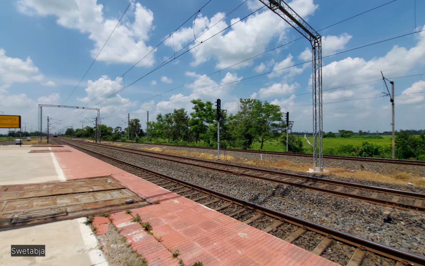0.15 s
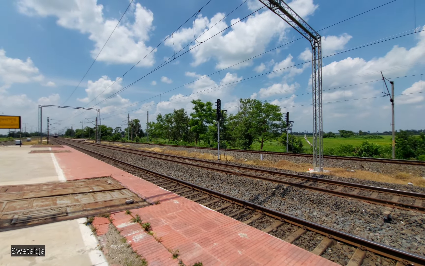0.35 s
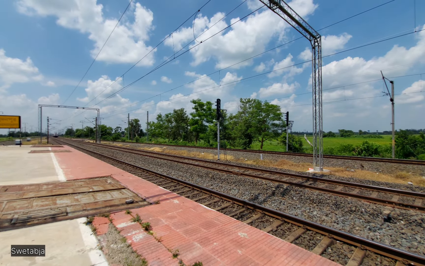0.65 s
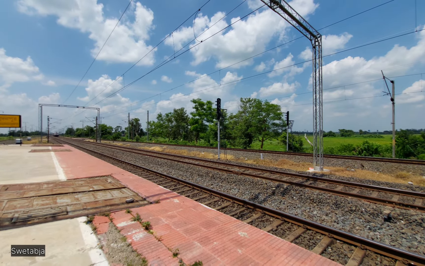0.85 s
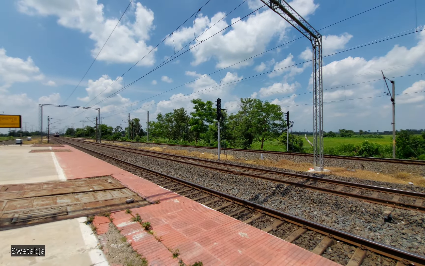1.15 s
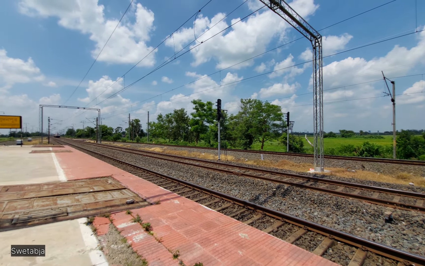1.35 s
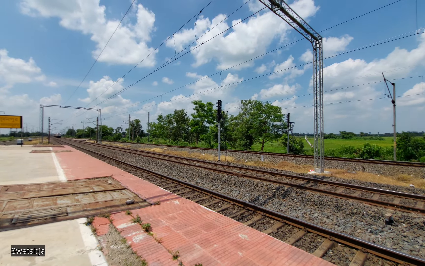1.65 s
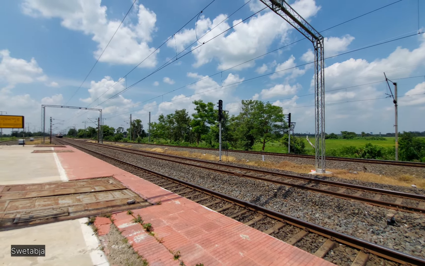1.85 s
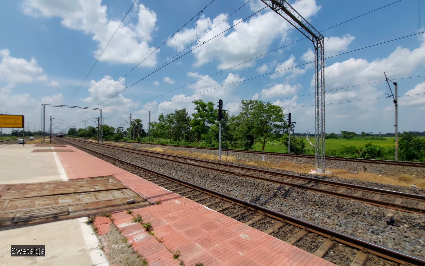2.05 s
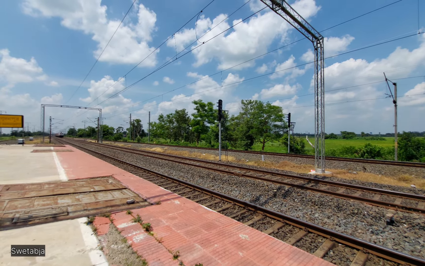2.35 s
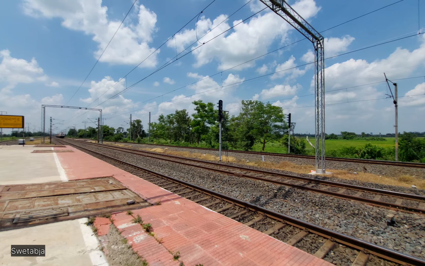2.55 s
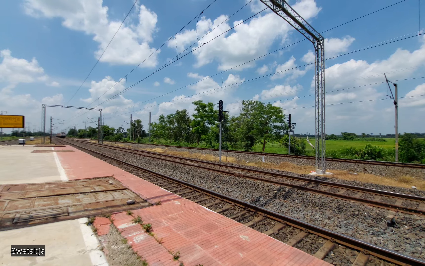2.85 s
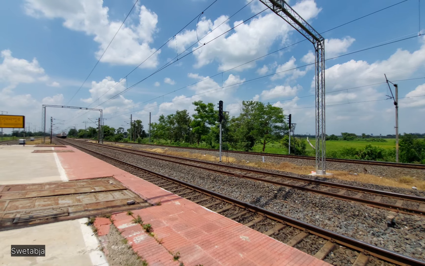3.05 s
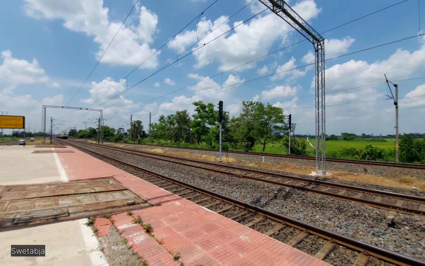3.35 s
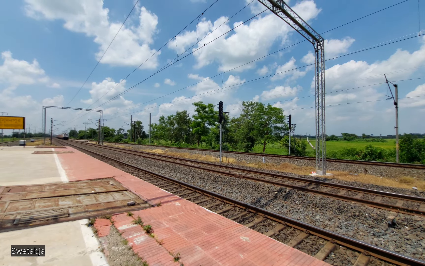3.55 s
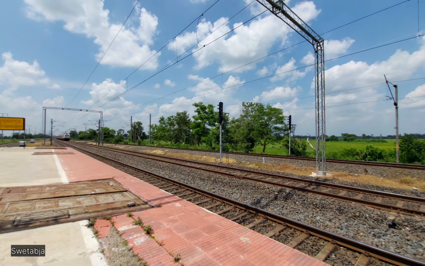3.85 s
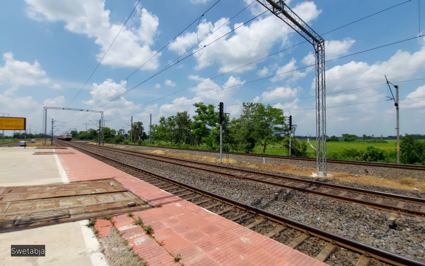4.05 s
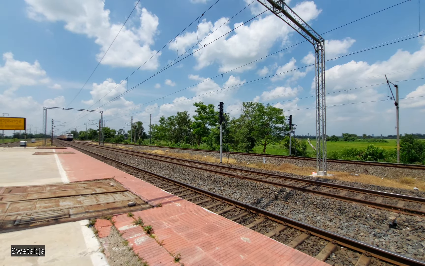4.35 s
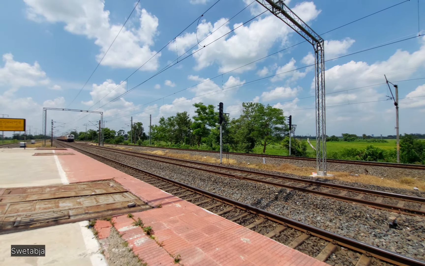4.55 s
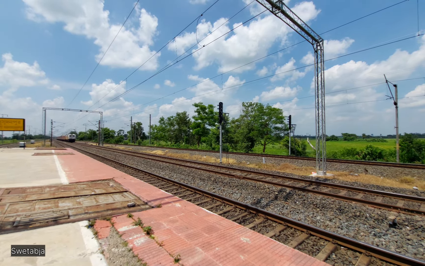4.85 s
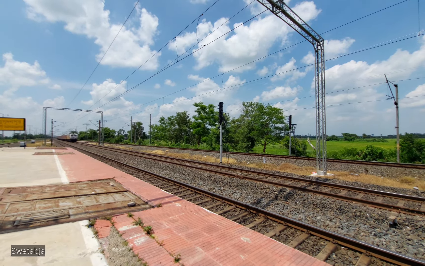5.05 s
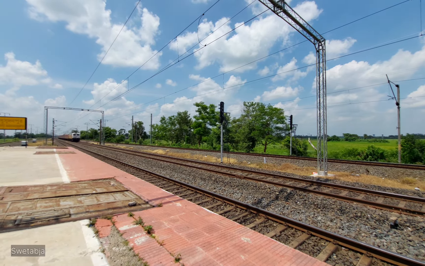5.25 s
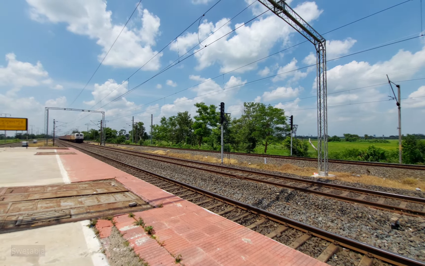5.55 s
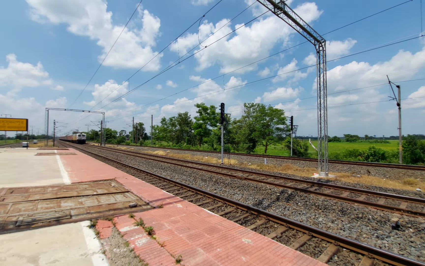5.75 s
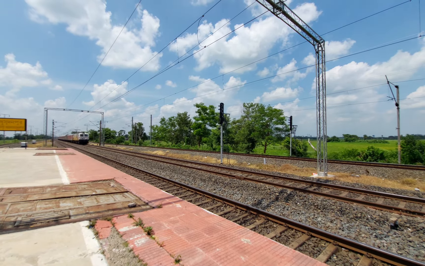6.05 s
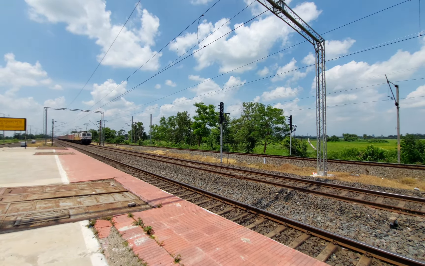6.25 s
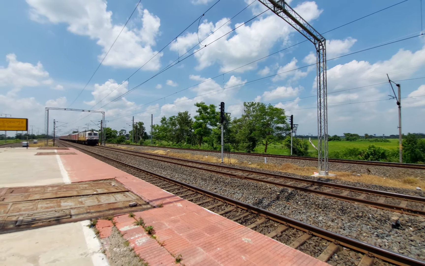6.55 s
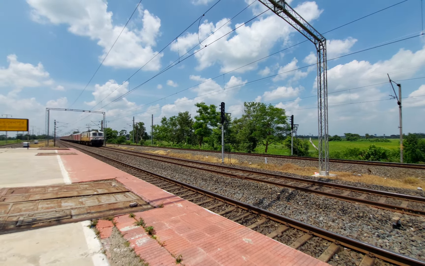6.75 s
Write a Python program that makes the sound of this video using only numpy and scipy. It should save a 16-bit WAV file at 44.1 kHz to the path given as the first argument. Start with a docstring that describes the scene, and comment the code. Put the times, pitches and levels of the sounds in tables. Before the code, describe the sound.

An open-air country railway platform, heard through a stereo microphone buffeted by wind. At 0 s the faint echo of an air horn is dying away over low wind rumble, soft train rolling and thin rail hiss. From 0.3 to 1.8 s a distant electric locomotive blows one long note, mid-pitched around 350 Hz, its overtones swelling and fluttering in the moving air. It fades in echoes while a heavy wind thump lands near 1.9 s. Between 2.3 and 2.85 s a few tiny far birds chirp. From about 3.1 s a low unsteady hum grows strong and the rolling and hiss rise, with short treble sizzles. At 4.15 s the second blast starts slightly sharp, settles on the same note, and is much louder and brighter, becoming steadier after 6 s and lasting to the end near 6.9 s. Wind slaps hit mainly the left side; very short crackles break the horn around 6.6-6.8 s.

```python
"""The echo of a one-note air horn dies away, then an electric locomotive nearing a country platform blows
two long blasts: sums of overtones that moving air makes swim. Through it all the train rolls and hisses
(shaped noise with fuzzy tones) and wind rumbles, thumps and slaps (low noise in swells). Between the blasts
a few far birds chirp (sliding sine tones), then a low hum (an unsteady sine) grows strong. The second
blast lasts to the end; a few very short crackles of noise cut into it near its close."""
import sys
import numpy as np
from scipy.fft import rfft, irfft, next_fast_len
from scipy.io import wavfile
from scipy.ndimage import uniform_filter1d, map_coordinates

SR = 44100
rng = np.random.default_rng(int(sys.argv[2]) if len(sys.argv) > 2 else 0)


def generate_wav(sig):
    """Save sig (samples, or channels by samples) to the path in sys.argv[1] as 16-bit PCM at SR."""
    pcm = np.round(np.clip(np.atleast_2d(sig).T, -1, 1) * 32767).astype(np.int16)
    wavfile.write(sys.argv[1], SR, pcm)


N = 304290
T = np.arange(N) / SR  # time of each sample in seconds
STEP = 32  # samples between the points of slow controls


def amp(db):
    """Turn dB into a gain."""
    return 10 ** (np.asarray(db) / 20)


def unit(x):
    """Scale a signal to an rms (average strength) of 1."""
    return x / np.sqrt(np.mean(np.abs(x) ** 2) + 1e-20)


def curves(rows):
    """Join the points of each column after the time by straight lines, one value per sample."""
    seconds, *columns = np.transpose(rows)
    return np.array([np.interp(T, seconds, column) for column in columns])


def wobble(rate):
    """A smooth random curve of rms 1 with this many random points a second."""
    knots = rng.standard_normal(1200)
    coarse = map_coordinates(knots, [T[::16] * rate], order=2)
    return unit(coarse.repeat(16)[:N])


def filtered(x, response):
    """Change the strength of each frequency in x by the response."""
    padded = next_fast_len(N + 8192)
    spectrum = rfft(x, padded) * response(np.fft.rfftfreq(padded, 1 / SR))
    return irfft(spectrum, padded)[..., :N]


def noise(colour, alike, lead=0):
    """Coloured two-port noise of rms 1; its shared part reaches the left port lead samples early."""
    colour_hz, colour_db = np.transpose(colour)
    common, left, right = rng.standard_normal((3, N))
    shared = np.array([np.roll(common, -lead), common])
    pair = np.sqrt(alike) * shared + np.sqrt(1 - alike) * np.array([left, right])
    return unit(filtered(pair, lambda hz: amp(np.interp(np.log(hz + 1), np.log(colour_hz), colour_db))))


def bump(centre, length):
    """A smooth swell from 0 to 1 and back, lasting length seconds."""
    return np.cos(np.pi * np.clip((T - centre) / length, -.5, .5)) ** 2


def horn():
    """Each overtone arrives straight and by wandering paths that add or cancel, so it swells and flutters."""
    # The first overtone of each of the four registers.
    first_overtones = [1, 2, 7, 11]
    # Colour of the horn's bell. Each row: overtone number, level in dB within its register.
    bell = [(1, .7), (2, -4.2), (3, 1), (4, 5), (5, -4), (6, -5.5), (7, -2), (10, -3), (11, -5), (14, -2.8),
            (17, -9), (20, -15), (23, -21), (26, -18.5), (34, -22.5), (38, -31), (43, -36)]
    # Path of the sound. Each row: time in seconds, scattered share (0-1) before the overtone's own factor,
    # samples of left lead lost as the train moves across, dulling in dB (grows from overtone 14, full at 24).
    air_path = [(0, .5, 0, 9), (2, .5, 0, 5), (4.1, .6, 0, 3), (4.6, .5, 0, 3), (5.3, .47, 0, 1),
                (5.66, .45, .05, 1), (5.76, .45, .1, 9), (5.87, .38, .25, 4), (6.0, .25, .5, 10),
                (6.4, .15, 1.1, 4), (6.72, .13, 1.35, 0), (6.9, .12, 1.5, 4)]
    # How the two ports hear the horn. Each row: overtone number, left minus right level in dB,
    # radians by which the left leads, likeness of the two sides (0-1).
    port_differences = [(1, -.8, .58, .99), (2, 2.1, 1.13, .92), (3, -4.6, 1.92, .92), (4, -1.7, 3.34, .91),
                        (5, -1.4, 3.3, .76), (6, -2.2, 5.68, .64), (7, -.3, 2.27, .31), (8, 2.2, 2.16, .48),
                        (9, 1.4, 6.36, .34), (10, .3, 5.8, .74), (13, -4.5, 8.8, .7),
                        (16, -2.9, 11.66, .67), (20, 2.8, 14.7, .52), (24, 2.3, 16, .5),
                        (34, -2, 23.5, .28), (43, 1.9, 26.5, .15)]
    # Swells and fades of single overtones. Each row: centre in seconds, length in seconds,
    # overtone number, change in dB.
    overtone_swells = [(.45, .6, 2, -7), (.84, .25, 2, 4), (1.1, .45, 2, -10), (1.72, .45, 2, 6),
                       (4.26, .55, 2, -14), (5.47, .3, 2, 4), (5.7, .16, 2, 3), (5.81, .07, 2, -10),
                       (6.74, .15, 2, -5), (.55, .6, 3, 4), (.88, .25, 3, -5), (1.41, .2, 3, -5),
                       (4.155, .07, 3, 7), (4.14, .07, 6, -10), (4.4, .25, 3, 4), (4.58, .22, 3, -9),
                       (5.0, .25, 3, -5), (5.31, .16, 3, -14), (5.78, .14, 3, -10), (6.2, .15, 3, -4),
                       (6.65, .25, 3, -3), (.46, .3, 6, -11), (.86, .2, 6, -5), (1.27, .5, 6, 6.5),
                       (4.5, .3, 6, -6), (5.1, .45, 6, 6), (5.7, .4, 6, -9), (6.12, .45, 6, -14),
                       (6.75, .5, 6, 4), (.5, .6, 4, -7), (1.1, .3, 4, -7), (4.4, .2, 4, 5),
                       (5.08, .4, 4, 5), (5.95, .9, 4, -9), (6.8, .3, 4, -5), (5.12, .4, 5, 7),
                       (6.3, .5, 5, -7), (4.34, .3, 7, 7), (4.8, .45, 7, -9), (1.52, .2, 8, 6),
                       (4.52, .18, 8, 8), (.44, .45, 9, -12), (1.16, .2, 9, 4), (6.46, .3, 9, -8),
                       (.96, .45, 10, 5), (1.28, .2, 10, -9), (4.22, .3, 10, -9), (5.54, .35, 10, 5),
                       (4.4, .3, 11, -10), (4.76, .35, 11, 4), (6.66, .35, 11, -11), (4.3, .3, 12, 4),
                       (4.82, .3, 12, 4), (6.0, .35, 13, 5), (.6, .7, 14, 4), (6.0, .3, 14, 5),
                       (6.64, .45, 17, 4), (6.64, .45, 18, 5), (6.64, .45, 19, 5), (6.64, .45, 20, 4)]

    hz, levels, echoing = blowing()
    cycle = np.exp(2j * np.pi * np.cumsum(hz) / SR)
    scattered, lost_lead, dull_db = curves(air_path)[:, ::STEP]
    tail_scattered = .93  # scattered share of the echoes
    scattered = scattered + (tail_scattered - scattered) * echoing[::STEP]
    lost_turn = 2 * np.pi * hz[::STEP] * lost_lead / SR  # radians at the first overtone
    overtones, *port_columns = np.transpose(port_differences)
    out, wave = np.zeros((2, N)), np.ones(N)
    for k in range(1, 44):
        wave = wave * cycle  # now k turns for each cycle of the note
        pan_db, lead, alike = (np.interp(k, overtones, column) for column in port_columns)
        share = scattered * (1 - np.exp(-(k / 4.8) ** 0.91))  # short waves scatter more
        apart = np.clip(1.55 * scattered * (1 - alike), 0, 1)  # paths that reach one port only
        # the low overtones wander less by chance
        shared, *own = drift(width_hz=2.94 + 0.24 * k, slope=1.28, edge_hz=141,
                             patchy_db=3.5, slow_db=-9 if k < 7 else -4)
        swell_db = sum(db * bump(centre, length)[::STEP]
                       for centre, length, overtone, db in overtone_swells if round(overtone) == k)
        calm = amp(-2 * np.clip(swell_db, 0, 20))  # a swell comes by the straight path, so it is clean
        share, apart = share * calm, apart * np.sqrt(calm)

        register = np.searchsorted(first_overtones, k, side="right") - 1
        bell_db = np.interp(k, *np.transpose(bell))
        dulling_db = dull_db * np.clip((k - 14) / 10, 0, 1)
        level = levels[register, ::STEP] * amp(bell_db + swell_db - dulling_db)
        for port, sign in enumerate((1, -1)):  # left, right
            both_ports = np.sqrt(1 - share) + np.sqrt(share) * shared
            path = np.sqrt(1 - apart) * both_ports + np.sqrt(apart) * own[port]
            phase = sign * (lead - k * lost_turn) / 2 - 1.3 * np.sqrt(k)  # the bell delays the lows
            gain = np.sqrt(2) * amp(sign * pan_db / 2) * level * path * np.exp(1j * phase)
            out[port] += (np.interp(T, T[::STEP], gain) * wave).real
    return with_crackles(out)


def blowing():
    """Pitch, register levels and echo share: a blast rises fast, starts sharp, holds and dies in echoes."""
    # The settled note. Each row: time in seconds, pitch in Hz.
    settled_pitch = [(0, 353), (.76, 351.9), (1.77, 352), (2.1, 353.3), (4.3, 352.7), (4.78, 352.7),
                     (5.67, 351.3), (5.78, 353.3), (6.1, 351), (6.36, 353.1), (6.9, 352.6)]
    # Each row: start in seconds, end in seconds, Hz sharp at the start,
    # seconds for the lowest register's echo to fall 60 dB.
    blasts = [(-1, -.03, 0, .75), (.3, 1.8, 2.8, 1.3), (4.15, 6.95, 7, 1.3)]
    # The blast that has just ended. Each row: time in seconds, level in dB of each register, low to high.
    ended_blast = [(0, -35, -38, -46, -41)]
    # One list for each long blast. Each row: time in seconds, level in dB of each register, low to high.
    long_blasts = [
        [(0.325, -40, -34, -45, -35), (0.763, -34, -34, -38, -32), (0.817, -36, -37, -47, -28),
         (0.861, -33, -36, -36, -36), (0.927, -33, -36, -40, -34), (0.997, -30, -36, -32, -33),
         (1.095, -29, -32, -36, -35), (1.165, -29, -30, -32, -32), (1.277, -30, -26, -41, -34),
         (1.495, -35, -37, -37, -33), (1.543, -40, -32, -34, -29), (1.589, -42, -32, -43, -32),
         (1.647, -39, -35, -38, -31), (1.687, -47, -40, -44, -37), (1.8, -42, -35, -44, -38)],
        [(4.17, -28, -23, -30, -24), (4.51, -28, -31, -31, -29), (4.76, -25, -24, -35, -24),
         (4.82, -25, -25, -30, -23), (5.14, -26, -24, -32, -29), (5.35, -26, -27, -30, -24),
         (5.45, -30, -22, -36, -27), (5.51, -27, -24, -28, -24), (5.75, -25, -31, -37, -31),
         (5.95, -23, -23, -29, -19), (6.04, -26, -21, -31, -24), (6.27, -24, -22, -29, -21),
         (6.45, -22, -18, -36, -24), (6.67, -33, -24, -27, -20), (6.89, -27, -19, -32, -23)],
    ]
    # Echo time of each register, low to high, as a share of the lowest one's.
    tail_lasts = np.reshape([1, .85, .6, .48], (4, 1))

    attack_s, settle_s = .05, .06  # lowest register's 40 dB rise before the start; time constant of the sinking
    echo_first_s = .13  # echoes take over this long before the tail falls away
    hz, levels, echoing = curves(settled_pitch)[0], np.zeros((4, N)), np.ones(N)
    for (start, end, sharp_hz, t60), held in zip(blasts, [ended_blast, *long_blasts]):
        rise_db = -40 * (start - T).clip(0) / attack_s / tail_lasts ** .5  # the highs speak last
        fall_db = -60 * (T - end).clip(0) / (t60 * tail_lasts)
        levels = levels + amp(curves(held) + rise_db + fall_db)
        sharpness = np.exp(-(T - start).clip(0) / settle_s) * (T > start - attack_s)
        hz = hz + sharp_hz * sharpness
        echoing = echoing * ((T < start - attack_s) | (T > end - echo_first_s))
    return hz, levels, uniform_filter1d(echoing, size=2000)


def drift(width_hz, slope, edge_hz, patchy_db, slow_db):
    """Three random gains with phase: slow swells, with finer flutter on top that comes and goes."""
    count = len(T[::STEP])
    hz = np.fft.fftfreq(count, STEP / SR)
    shape = (1 + (hz / width_hz) ** 2) ** (-slope / 2) * np.exp(-(hz / edge_hz) ** 4)
    slow = np.exp(-(hz / 9) ** 2)  # the part slower than about 9 Hz
    white = rng.standard_normal((3, count)) + 1j * rng.standard_normal((3, count))
    scale = np.sqrt(np.mean(np.abs(np.fft.ifft(white * shape)) ** 2))
    patches = unit(amp(patchy_db * wobble(9)[::STEP]))
    swells = amp(slow_db) * np.fft.ifft(white * shape * slow)
    flutter = patches * np.fft.ifft(white * shape * (1 - slow))
    return (swells + flutter) / scale


def with_crackles(tone):
    """For a few hundredths of a second noise as loud as the tone around it takes part of the tone's place."""
    # Each row: centre in seconds, length in seconds, noise share at the centre (0-1).
    crackles = [(6.639, .012, .75), (6.755, .016, .5), (6.78, .02, .2), (6.824, .014, .33)]
    # Colour of the crackle noise. Each row: frequency in Hz, relative level in dB per Hz.
    crackle_colour = [(500, -35), (900, 2), (2200, -6), (6500, -4), (8000, -14), (13000, -19), (16000, -40)]
    noise_share = sum(share * np.sqrt(bump(centre, length)) for centre, length, share in crackles)
    loudness = uniform_filter1d(np.abs(tone), size=200, axis=1)
    crackle = loudness * noise(crackle_colour, 0.14, lead=15)
    return tone * np.sqrt(1 - noise_share ** 2) + 1.3 * noise_share * crackle


def train():
    """Rolling noise with fuzzy tones, a thin far roar, and a grainy hiss in the rails with short sizzles."""
    # Each row: time in seconds, rolling level in dB, far roar level in dB, rail hiss level in dB.
    train_levels = [(0, -48.5, -54, -55), (.2, -51.5, -54.5, -61), (1, -45.5, -56, -64),
                    (2.1, -48, -56.5, -58), (2.6, -50, -58.5, -57), (3.0, -49, -56, -55),
                    (3.4, -42, -54, -50.5), (3.7, -43, -49.5, -51), (4.1, -41, -47.5, -45.5),
                    (4.5, -44.5, -58, -72), (5.3, -41, -77, -64), (5.75, -41.5, -62, -59),
                    (6, -37.5, -62, -53), (6.9, -44, -48, -56)]
    # Drive and wheel tones. Each row: frequency in Hz, level in dB against the rolling noise.
    whine_tones = [(323, -15), (640, -17), (667.5, -12), (699.8, -8.5), (872, -27), (1114, -42)]
    # Sizzles high in the treble. Each row: start in seconds, level in dB, seconds to fade by 60 dB.
    sizzles = [(.04, -57, 0.28), (.585, -45, .2), (.89, -57, .15), (1.344, -42.5, 0.49), (1.45, -58, 0.46),
               (3.05, -55, 0.13), (3.36, -48, 0.11), (3.7, -52, 0.38), (3.86, -38, 0.073), (4.0, -46, 0.4),
               (5.0, -38, .3)]
    # Colours of the three noises. Each row: frequency in Hz, relative level in dB per Hz.
    roll_colour = [(120, -25), (200, -11), (323, -7), (371, -13), (530, -17), (676, 2), (764, -10.5),
                   (878, -4.5), (1310, -10.5), (1600, -37.5), (2080, -64), (3520, -120)]
    roar_colour = [(880, -36), (1500, -6), (2240, -3), (2430, -6.5), (4030, -3.5), (4730, -7.5),
                   (7000, -8.5), (8000, -32), (10400, -50), (17600, -120)]
    hiss_colour = [(4410, -54), (7500, -31), (8260, -26), (9560, -21.5), (12100, -5), (12500, -6),
                   (15500, -22)]

    roll_db, roar_db, hiss_db = curves(train_levels)
    tones = np.zeros(N)
    for hz, db in whine_tones:
        turn = 2 * np.pi * hz * T
        tones += amp(db) * (wobble(6.5) * np.sin(turn) + wobble(7.7) * np.cos(turn))
    rolling = amp(1.5 * wobble(7.9)) * noise(roll_colour, 0.51, lead=11)
    roll = amp(roll_db) * (rolling + np.array([np.roll(tones, -13), tones]))  # tones reach the left first
    roar = amp(roar_db + 1.9 * wobble(4.9)) * noise(roar_colour, 0.098, lead=13)

    sizzle = np.zeros(N)
    for start, db, t60 in sizzles:
        age = (T - start).clip(0)
        sizzle += amp(db - 60 * age / t60) * (1 - np.exp(-age / 0.004))
    grain = amp(0.78 * wobble(9.8) + 1.5 * wobble(60))
    return roll + roar + (amp(hiss_db) + sizzle) * grain * noise(hiss_colour, 0.12, lead=13)


def train_hum():
    """A low sine of unsteady pitch and level, faint and rising at first, then strong as the train nears."""
    # Each row: time in seconds, level in dB, pitch in Hz.
    hum_course = [(0, -60, 110), (.85, -56, 110), (1.0, -45, 114), (1.75, -51, 134), (2.0, -60, 136),
                  (2.97, -60, 80), (3.15, -30, 82), (3.25, -36, 82), (3.4, -33, 82), (4.0, -32, 82),
                  (4.6, -38, 83), (5.35, -34, 83), (5.55, -38, 83), (5.75, -30.5, 83), (6.0, -32, 83),
                  (6.12, -39, 83), (6.9, -49, 83)]
    hum_db, hz = curves(hum_course)
    level = np.sqrt(2) * amp(hum_db + 2 * wobble(9) + 2 * wobble(30))
    hum = level * np.sin(2 * np.pi * np.cumsum(hz + 3.5 * wobble(22)) / SR)
    return hum * amp([[-.7], [.7]])  # left, right


def wind_rumble():
    """Wind buffets the ports: low noise evened out, then made to lurch, with a few heavy thumps."""
    # Colour of the rumble. Each row: frequency in Hz, relative level in dB per Hz.
    buffet_colour = [(12, -52), (20, -6), (53, 7.5), (86, 11), (300, -13.5), (348, -24), (400, -29),
                     (520, -55), (880, -120)]
    # Each row: time in seconds, left level in dB, right level in dB.
    wind_levels = [(0, -36, -35), (.3, -43, -38), (.6, -50, -41), (1.0, -40, -40), (1.45, -38, -38),
                   (1.7, -58, -46), (2.1, -43, -39), (2.6, -50, -48), (3.0, -35, -38), (3.4, -38, -38),
                   (4.3, -38, -38), (4.8, -46, -39), (5.2, -40, -40), (5.5, -49, -41), (5.8, -40, -40),
                   (6.15, -49, -40), (6.9, -55, -52)]
    # Each row: centre in seconds, length in seconds, left level in dB, right level in dB.
    wind_thumps = [(.78, .04, -25, -19), (.89, .1, -29, -31), (1.93, .18, -18, -21.5),
                   (2.12, .07, -35, -33), (2.32, .06, -37, -36), (2.48, .08, -31, -34),
                   (2.74, .06, -35, -51), (2.88, .06, -31, -60), (3.13, .14, -31, -29)]
    rumble = noise(buffet_colour, 0.22)
    power = np.abs(uniform_filter1d(rumble ** 2, size=2500, axis=1))
    rumble = unit(rumble / np.sqrt(power + 0.1))  # steady wind between gusts
    lumps = np.array([unit(amp(depth_db * wobble(14))) for depth_db in (4, 2.5)])  # left, right
    thumps = sum(amp([[left_db], [right_db]]) * bump(centre, length)
                 for centre, length, left_db, right_db in wind_thumps)
    return (amp(curves(wind_levels)) * lumps + thumps) * rumble


def gusts():
    """Short crumpled slaps of wind, mostly on the left port: noise in swells with a fast random level."""
    # Each row: centre in seconds, length in seconds before a stretch of 1.32, left dB, right dB.
    wind_slaps = [(0.37, 0.17, -43, -70), (.55, 0.14, -45, -62), (.68, 0.066, -37, -60),
                  (.79, .08, -54, -40), (0.866, .1, -48, -50), (1.503, 0.13, -38, -70),
                  (1.606, 0.14, -45, -70), (1.661, 0.023, -40, -52), (1.88, 0.082, -43, -42),
                  (1.938, 0.05, -35, -30.5), (2.001, 0.056, -44, -41), (2.907, 0.084, -48, -47),
                  (2.967, 0.066, -54, -47), (3.039, 0.054, -42, -46), (3.133, 0.058, -62, -49),
                  (4.587, 0.12, -38.5, -70), (4.686, .12, -30.5, -43), (4.781, 0.099, -31.5, -60),
                  (4.917, .12, -40, -70), (5.102, 0.059, -48, -70), (5.467, 0.18, -30, -52),
                  (5.661, .08, -39, -70), (6.089, 0.16, -33.5, -70), (6.199, .07, -32, -70),
                  (6.265, 0.084, -27.5, -70), (6.434, 0.062, -34, -70), (6.52, .07, -42, -70),
                  (6.659, 0.1, -33.5, -70), (6.792, 0.14, -39.5, -70)]
    # Colour of the slaps. Each row: frequency in Hz, relative level in dB per Hz.
    slap_colour = [(120, -33), (200, 0), (300, 8), (500, -4), (800, -18.5), (1500, -32), (3000, -80)]
    shape = sum(amp([[left_db], [right_db]]) * bump(centre, 1.32 * length)
                for centre, length, left_db, right_db in wind_slaps)
    return shape * amp(4.0 * wobble(45)) * noise(slap_colour, 0.42)


def birds():
    """Thin whistles: sine tones, steady or sliding quickly towards their end pitch."""
    # Each row: start in seconds, length in seconds, start pitch in Hz, end pitch in Hz,
    # level in dB before the left-right balance.
    chirps = [(2.3, 0.034, 3600, 3600, -59), (2.34, 0.073, 2750, 2320, -51), (2.38, 0.043, 3380, 3380, -61),
              (2.59, 0.037, 3560, 3700, -59), (2.667, .085, 2700, 2300, -63), (2.79, .04, 2700, 2350, -60)]
    out = np.zeros(N)
    for start, length, start_hz, end_hz, db in chirps:
        hz = end_hz + (start_hz - end_hz) * np.exp(-4.5 * (T - start).clip(0) / length)
        swell = np.sqrt(bump(start + length / 2, length))
        out += amp(db) * swell * np.sin(2 * np.pi * np.cumsum(hz) / SR)
    return out * amp([[-2.5], [2.5]])  # left, right


def scene():
    """All sources added together at the two microphone ports."""
    return horn() + train() + train_hum() + wind_rumble() + gusts() + birds()


def record(dry):
    """Round off the loudest peaks and keep nothing from the band limit up."""
    top_hz = 15650
    rounded = dry / (1 + np.abs(dry / .98) ** 6) ** (1 / 6)
    return filtered(rounded, lambda hz: hz < top_hz)


dry = scene()
out = record(dry)
generate_wav(out)
```